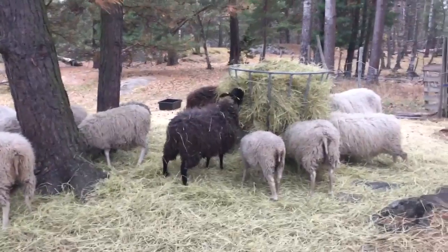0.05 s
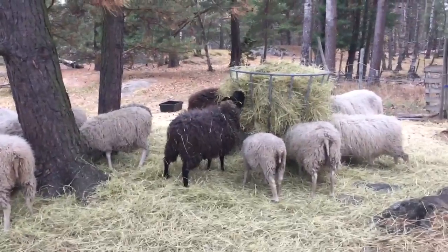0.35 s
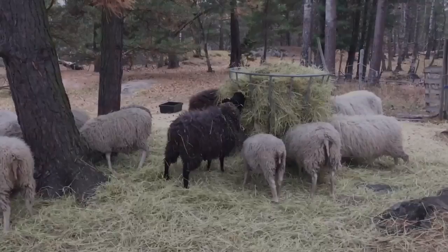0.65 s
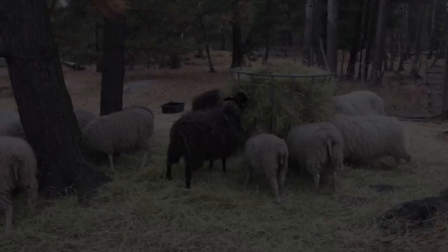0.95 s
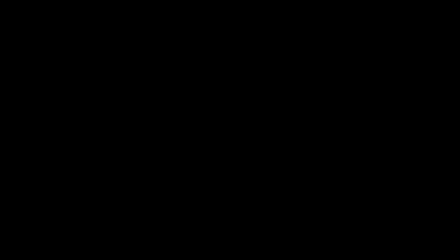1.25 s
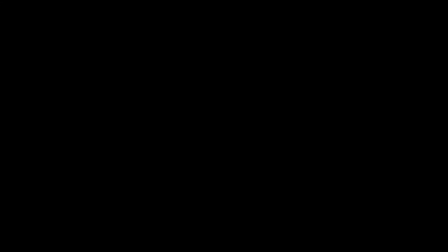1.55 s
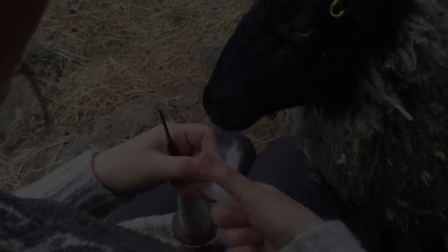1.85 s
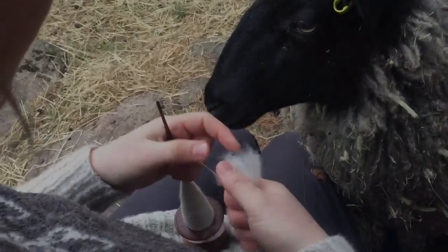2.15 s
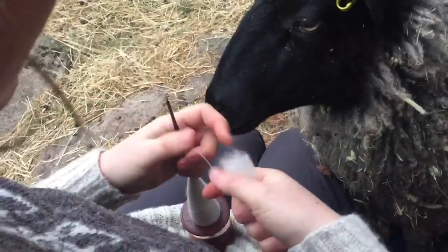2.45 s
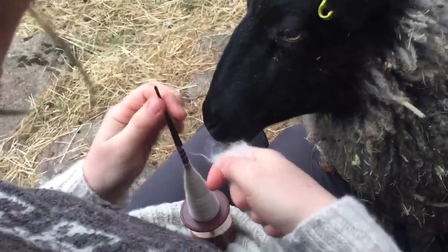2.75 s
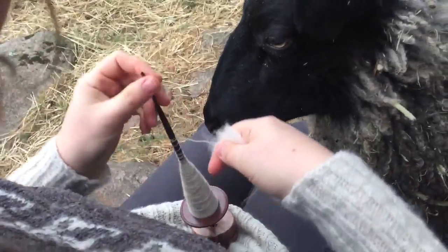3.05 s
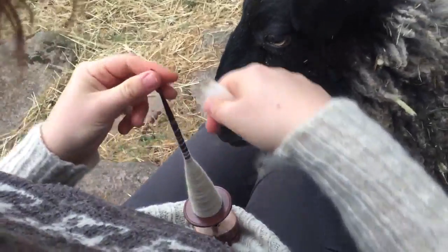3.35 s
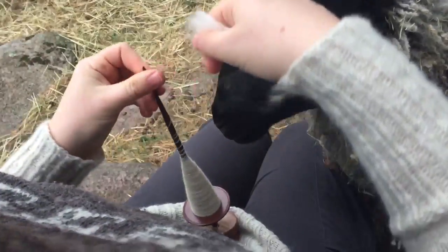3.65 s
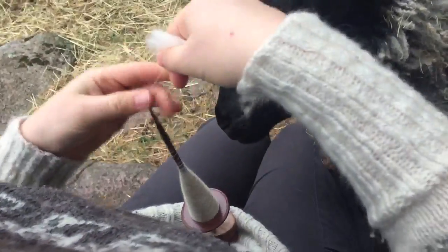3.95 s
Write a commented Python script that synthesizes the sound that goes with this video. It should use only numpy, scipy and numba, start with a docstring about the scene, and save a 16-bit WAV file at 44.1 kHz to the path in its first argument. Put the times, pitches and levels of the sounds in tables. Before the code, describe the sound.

A sheep bleats once loudly, then soft wind rumbles on the microphone with faint ticks.

```python
"""A sheep among trees holds one loud bleat: vocal pulses and puffs of air ring its throat and mouth.
The mouth narrows, the pitch sags and the voice ends in a rasp, scattered by the trunks.
The glade cuts off and a quiet pasture fades in: soft wind bumps on the microphone, small ticks
and rustles of wool being spun, a few faint bird chirps and a distant rush."""
import sys
import numpy as np
from scipy import signal
from scipy.fft import rfft, irfft
from scipy.io import wavfile
from scipy.ndimage import uniform_filter1d
from numba import njit

SR = 44100
rng = np.random.default_rng(int(sys.argv[2]) if len(sys.argv) > 2 else 0)


def master(y):
    """Save y as 16-bit WAV."""
    cut = np.clip(np.atleast_2d(y).T, -1, 1)
    pcm = np.round(cut * 32767)  # scale
    wavfile.write(sys.argv[1], SR, pcm.astype(np.int16))


N = 176400

PRESS_S, NARROW_S, SAG_S, CLOSE_S, MOVE_S = .205, .265, .345, .365, .035  # bleat stages, transition time
SPLIT_HZ = 3020  # voice body below, treble above


def sheep():
    """One bleat: jittery vocal pulses and pitch-synchronous puffs of air drive throat and mouth."""
    # (time [s], pitch before the sag [Hz])
    pitch = [(0.01, 177.7), (0.044, 176.3), (0.186, 178.3), (0.21, 175.1), (0.31, 172.5), (0.34, 170.8)]
    # (time [s], roughness [0-1])
    roughness = [(0, 0.2), (.1, .05), (.19, .06), (.23, .18), (.3, 0), (.345, .16), (.385, 0.61),
                 (.45, 0.7)]
    # (time [s], body level [dB], treble level [dB])
    effort = [(0.01, -24.5, -40), (0.048, -24, -44), (0.206, -24.5, -41), (0.25, -26, -39),
              (0.386, -31.5, -46.5), (0.42, -37, -53.5), (0.47, -84, -61)]
    sag_hz_per_s, jitter, shimmer_db, rasp, treble_rasp = 320, .022, 2, 1.3, .3
    rough = curve(roughness)
    hz = np.maximum(curve(pitch) - sag_hz_per_s * np.maximum(clock() - SAG_S, 0), 130)
    phase = np.cumsum(hz * (1 + jitter * rough * walk(180))) / SR % 1
    offset_samples = (phase - .5) * SR / hz
    pulses = -unit(np.sinc(offset_samples) * np.exp(-(offset_samples / 6) ** 2))
    pulses *= undb(shimmer_db * rough * walk(150))
    puffs = unit(edge(noise(), 990, "high", order=2) * np.exp(-((phase - .5) % 1) / .8))
    source = smear(pulses + rasp * rough * puffs)
    body = mouth(source, closing_mouth(source + rough * puffs, pulses, puffs))
    treble = throat_treble(source + (treble_rasp + rough) * puffs)
    voice = body * undb(curve(effort) + 1.5) + treble * undb(curve(effort, column=2) - .5)
    return voice * (1 - ramp(.438, .03))


def mouth(source, closing):
    """Throat and mouth shape the voice body: open, pressed, narrowed, then closing."""
    # response of each shape (frequency [Hz], gain [dB])
    wide_open = [(88, -42.5), (150, -7), (343, -10.5), (717, 2), (894, -11), (1040, -26), (1190, -7),
                 (1230, 1.5), (1460, -4.5), (1620, -12.5), (1750, -7), (1940, -16), (2100, -5.5),
                 (2420, -15.5), (2720, -5), (2830, -10.5), (3090, -28), (3300, -38.5), (4290, -60.5),
                 (7260, -120)]
    pressed = [(88, -38.5), (150, -3.5), (334, -9), (506, -3.5), (708, 1), (917, -10), (1420, 2),
               (1620, -2), (1820, -21.5), (2020, 0), (2130, 0), (2420, -28), (2680, -2.5), (2830, 5.5),
               (2940, -4), (3130, -23.5), (3300, -27.5), (4290, -57.5), (7260, -120)]
    narrowed = [(88, -42.5), (150, -7), (182, -3.5), (348, -16.5), (493, -11.5), (647, 5.5), (699, 0),
                (871, -17), (1000, -2), (1220, -11), (1580, -1), (1800, -24.5), (2020, -7.5), (2270, -11.5),
                (2420, -14.5), (2860, -10), (3300, -29), (4290, -56), (7260, -120)]
    stages = (PRESS_S, colour(source, pressed)), (NARROW_S, colour(source, narrowed)), (CLOSE_S, closing)

    def body_band(x):
        return steady(edge(edge(x, SPLIT_HZ, "low", order=10), 130, "high", order=3))

    body = body_band(colour(source, wide_open))
    for at_s, shaped in stages:
        body += ramp(at_s, MOVE_S) * (body_band(shaped) - body)
    return steady(body)


def closing_mouth(source, pulses, puffs):
    """As the jaw closes, the lowest resonance falls and the upper ones are muffled."""
    # upper resonances (centre [Hz], width [Hz], gain [dB])
    formants = [(830, 200, -10.5), (1272, 43, 4), (1565, 200, -3.5), (2102, 160, -2), (2800, 260, -5)]
    jaw_fall_hz_per_s, muffle_db_per_s = 2660, 82
    since_sag_s = clock() - SAG_S
    jaw_hz = np.clip(613 - jaw_fall_hz_per_s * since_sag_s, 400, 680)
    jaw = undb(5.5) * resonance(pulses + .078 * puffs, jaw_hz, width_hz=110.)
    muffled = source * undb(-muffle_db_per_s * np.clip(since_sag_s, 0, .1))
    return jaw + sum(undb(db) * ring(muffled, hz, width_hz) for hz, width_hz, db in formants)


def throat_treble(source):
    """Fluttering top of the voice; a high throat resonance grows once the voice is pressed."""
    # (frequency [Hz], gain [dB])
    response = [(1760, -31), (3000, 0.5), (3170, -0.5), (3440, 0.5), (3740, -6), (3950, -3.5), (4790, -2.5),
                (5420, -7), (7900, -13), (8950, -16.5), (10100, -18), (14300, -33.5), (15500, -35.5)]
    flutter_db = 1.5
    treble = edge(colour(source, response), SPLIT_HZ, "high")
    treble += undb(-1.5) * ramp(PRESS_S, MOVE_S) * ring(treble, hz=4800, width_hz=390)
    early = undb(-4.5) * scatter(treble, t60_s=.05, onset_s=.002)
    return steady(treble + early) * undb(flutter_db * walk(60))


def smear(x):
    """Many short paths delay each part of the treble differently, blurring the pulses but not the pitch."""
    max_delay_s, from_hz, full_hz = .007, 900, 2450
    hz = np.fft.rfftfreq(N, 1 / SR)
    knots_hz = np.arange(0, SR / 2, 250)
    delay_s = max_delay_s * np.interp(hz, knots_hz, rng.random(len(knots_hz)))
    delay_s *= np.interp(hz, [from_hz, full_hz], [0, 1])
    return irfft(rfft(x) * np.exp(-2j * np.pi * np.cumsum(delay_s) * SR / N), N)


def glade(voice):
    """The bleat scatters off the trunks over a soft background; a faint low tone follows it."""
    # background (frequency [Hz], gain [dB])
    spectrum = [(24, -47), (40, -18.5), (160, -7.5), (257, -23), (346, -3.5), (554, -44), (676, -8),
                (784, -35), (845, -18), (1320, -13.5), (1490, -18), (2110, -16.5), (15000, -33.5)]
    hum_hz = 345 * (1 + .0106 * walk(40))
    hum = undb(-48) * tone(hum_hz) * swell(.53, .035)
    trunks = undb(-10) * scatter(voice, t60_s=.26, onset_s=.013)
    background = undb(-52.5) * unit(colour(noise(), spectrum))
    return voice + trunks + background + hum


def wind_bumps():
    """Eddies push the microphone for a cycle or two."""
    # (time [s], pitch [Hz], level [dB])
    eddies = [(.765, 95.3, -58.5), (.803, 150.3, -56.5), (0.959, 140, -61), (1.128, 115, -44),
              (1.323, 111, -56.5), (1.5, 125, -45), (1.745, 96, -41), (1.895, 200, -36.5),
              (1.927, 249, -34), (1.937, 100, -35), (2.559, 146, -49.5), (2.691, 142, -48),
              (2.745, 67.5, -38), (2.757, 119, -36.5), (3.019, 98.5, -44), (3.083, 72.6, -38.5),
              (3.208, 100, -32.5), (3.25, 226, -34), (3.26, 105, -33), (3.521, 80.5, -43.5),
              (3.825, 59, -38.5)]
    sigma_cycles = .39
    out = np.zeros(N)
    for at_s, hz, db in eddies:
        cycles = (clock() - at_s) * hz
        out += undb(db) * np.sin(2 * np.pi * cycles) * np.exp(-.5 * (cycles / sigma_cycles) ** 2)
    return out


def ticks():
    """Small dry clicks of spinning, each with a brief ring and a short tail."""
    # (time [s], drive level [dB], decay [s])
    clicks = [(2.213, -41.5, 0.00072), (2.398, -68, 0.0053), (2.69, -68, .003), (2.852, -57, 0.0022),
              (3.914, -68, .003)]
    # (frequency [Hz], gain [dB])
    spectrum = [(1500, -13), (4000, -5), (8200, -1), (12500, 4), (15500, -1)]
    # (centre [Hz], width [Hz], gain [dB])
    modes = [(2740, 130, 10.5), (4440, 450, 6.5), (6630, 380, 8.5)]
    tail_db, tail_s = -17.5, .02
    envelope = np.zeros(N)
    for at_s, db, decay_s in clicks:
        age_s = np.maximum(clock() - at_s, 0)
        tail = undb(tail_db) * np.exp(-age_s / tail_s)
        envelope += undb(db) * (age_s > 0) * (np.exp(-age_s / decay_s) + tail)
    contact = envelope * noise() + 1e-18
    ringing = sum(undb(db) * ring(contact, hz, width_hz) for hz, width_hz, db in modes)
    return colour(contact, spectrum) + ringing


def wool():
    """Fibres slide past each other in soft, grainy swells."""
    # (time [s], level [dB], half length [s])
    rustles = [(1.313, -79.5, 0.025), (1.553, -78, 0.039), (1.69, -74, .04), (2.2, -69, 0.057),
               (2.5, -78, .07), (2.853, -61, 0.021), (3.174, -70, 0.015), (3.426, -66.5, .04),
               (3.955, -67, .015)]
    # (frequency [Hz], gain [dB])
    spectrum = [(3000, -18), (7000, -15), (9500, -7), (11200, -5), (13000, -3), (15500, -3)]
    grain_db = 3
    envelope = sum(undb(db) * swell(at_s, half_s) for at_s, db, half_s in rustles)
    friction = noise() * undb(grain_db * (walk(670) - .5))
    return envelope * unit(colour(friction, spectrum))


def bird():
    """Thin whistles that slide down and level off."""
    # (time [s], length [s], level [dB])
    chirps = [(2.82, 0.074, -67.5), (3.052, 0.051, -64.5), (3.655, 0.022, -71)]
    end_hz, drop_hz, glide_s, waver = 3650, 380, .0212, .009
    out = np.zeros(N)
    for at_s, length_s, db in chirps:
        age_s = np.clip(clock() - at_s, 0, length_s)
        hz = (end_hz + drop_hz * np.exp(-age_s / glide_s)) * (1 + waver * walk(300))
        envelope = np.sqrt(np.abs(np.sin(np.pi * age_s / length_s)))
        out += undb(db) * envelope * tone(hz)
    return out


def air():
    """A smooth distant rush fades in; an unsteady wind rumble comes up a little ahead of it."""
    # (time [s], level [dB])
    fade = [(0.6, -93), (0.67, -82.5), (0.84, -71.5), (1.24, -60), (1.85, -52), (2.79, -49.5),
            (2.81, -51.5), (3.46, -49.5), (4.0, -50.5)]
    # (frequency [Hz], gain [dB])
    rush_spectrum = [(120, -50), (200, -7), (253, -12.5), (358, -11), (471, -10), (525, -6), (677, -1),
                     (874, 1), (1190, -7), (1400, -8), (1710, -12), (2560, -29), (3820, -31), (4840, -35),
                     (7480, -39.5), (10200, -40), (11200, -39), (15500, -39.5)]
    rumble_spectrum = [(15, -51), (25, -19), (43, -5.5), (65, 2), (135, -7), (188, -9.5), (260, -29.5),
                       (340, -31), (570, -120)]
    swell_db, gust_db = .3, 2.6
    fade_db = curve(fade)
    lead_db = .056 * (fade_db.max() - fade_db)
    rush = unit(edge(colour(noise(), rush_spectrum), 156, "high", order=3))
    rush *= undb(.5 + swell_db * walk(8.9))
    rumble = unit(edge(colour(noise(), rumble_spectrum), 195, "low", order=4))
    rumble *= undb(-5 + lead_db + gust_db * walk(25.4))
    return (rush + rumble) * undb(fade_db) * ramp(.6, .04)


def scatter(x, t60_s, onset_s):
    """Dense reflections that begin after a delay and die away."""
    response = noise() * undb(-60 * clock() / t60_s) * ramp(onset_s, onset_s)
    return signal.fftconvolve(x, response / np.linalg.norm(response))[:N]


def colour(x, points):
    """Minimum-phase filter through (frequency [Hz], gain [dB]) points."""
    size = 4096
    hz, db = np.array(points).T
    gain = undb(np.interp(np.log(np.fft.rfftfreq(size, 1 / SR) + 1), np.log(hz), db))
    cepstrum = irfft(np.log(gain))
    cepstrum[1:size // 2] *= 2
    cepstrum[size // 2 + 1:] = 0
    return signal.fftconvolve(x, irfft(np.exp(rfft(cepstrum))))[:N]


@njit
def resonance(x, hz, width_hz):
    """State-variable band-pass with a moving centre."""
    y = np.empty(len(x))
    band_state, low_state = 0., 0.
    for i in range(len(x)):
        g, damping = np.tan(np.pi * hz[i] / SR), width_hz / hz[i]
        band = (band_state + g * (x[i] - low_state)) / (1 + g * (g + damping))
        band_state = 2 * band - band_state
        low_state += 2 * g * band
        y[i] = damping * band
    return y


def ring(x, hz, width_hz):
    """Band-pass with a constant centre."""
    return resonance(x, np.full(N, float(hz)), float(width_hz))


def edge(x, hz, kind, order=6):
    """Low-pass or high-pass."""
    return signal.sosfilt(signal.butter(order, hz, kind, fs=SR, output="sos"), x)


def tone(hz):
    """Sine following a pitch curve."""
    return np.sin(2 * np.pi * np.cumsum(hz) / SR)


def noise():
    """White noise."""
    return rng.standard_normal(N)


def walk(rate_hz):
    """Smooth random drift, rms 1."""
    hold = max(int(SR / rate_hz), 1)
    steps = np.repeat(rng.standard_normal(N // hold + 1), hold)
    return unit(uniform_filter1d(steps, hold)[:N])


def curve(rows, column=1):
    """One table column, interpolated linearly in time."""
    rows = np.array(rows)
    return np.interp(clock(), rows[:, 0], rows[:, column])


def ramp(at_s, length_s):
    """Rise from 0 to 1, centred on at_s."""
    return np.clip((clock() - at_s) / length_s + .5, 0, 1)


def swell(at_s, half_s):
    """Bell-shaped envelope, peak 1."""
    return np.exp(-((clock() - at_s) / half_s) ** 2)


def steady(x):
    """Hold the short-term rms at 1."""
    return x / np.sqrt(np.abs(uniform_filter1d(x ** 2, SR // 44)) + 1e-12)


def unit(x):
    """Scale to rms 1."""
    return x / np.sqrt(np.mean(x ** 2))


def undb(db):
    """Decibels to gain."""
    return 10 ** (np.asarray(db) / 20)


def clock():
    """Sample times [s]."""
    return np.arange(N) / SR


def scene():
    """The sheep's glade cuts off, then the pasture comes up; mono."""
    cut_s = .558
    bleat = glade(sheep()) * (1 - ramp(cut_s, .015))
    pasture = air() + wind_bumps() + ticks() + wool() + bird()
    return (bleat + pasture)[None]


def record(dry):
    """Cut the deepest bass and the top."""
    bottom_hz, top_hz = 27, 15700
    low_pass = signal.ellip(8, .2, 70, top_hz, fs=SR, output="sos")
    return signal.sosfilt(low_pass, edge(dry, bottom_hz, "high", order=2))


dry = scene()
out = record(dry)
master(out)
```